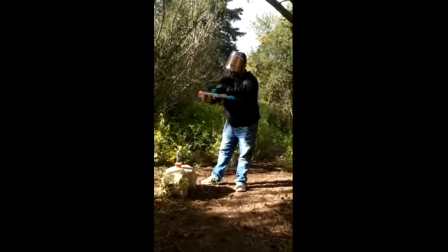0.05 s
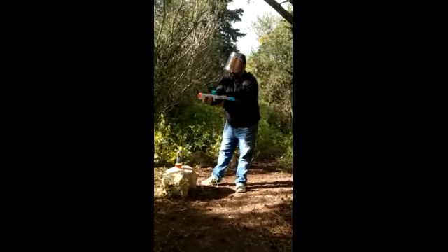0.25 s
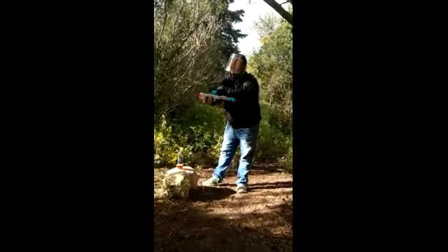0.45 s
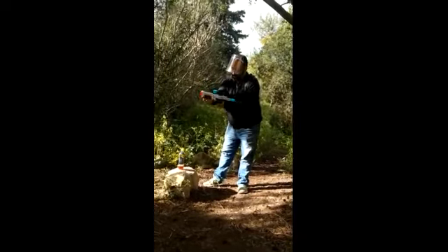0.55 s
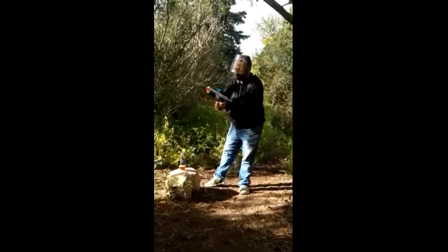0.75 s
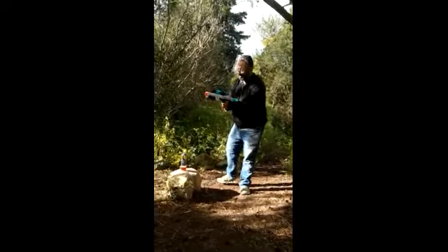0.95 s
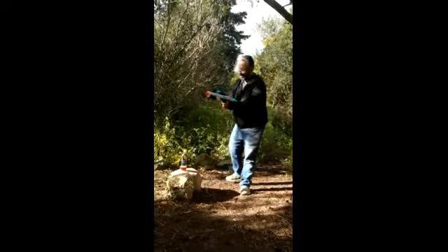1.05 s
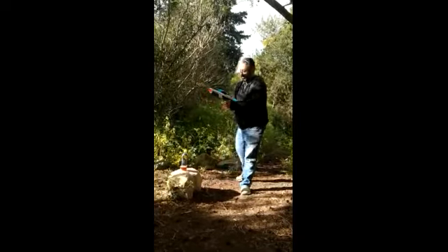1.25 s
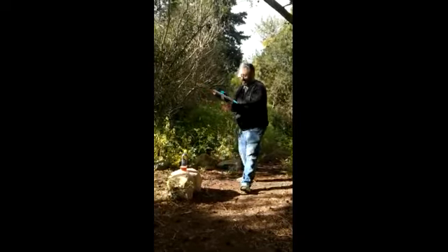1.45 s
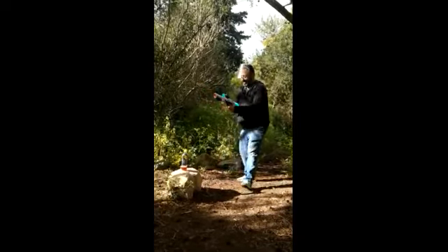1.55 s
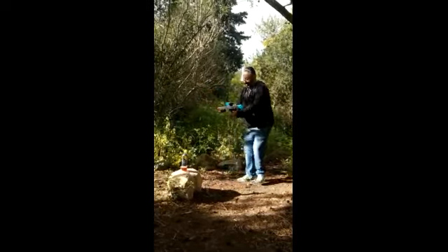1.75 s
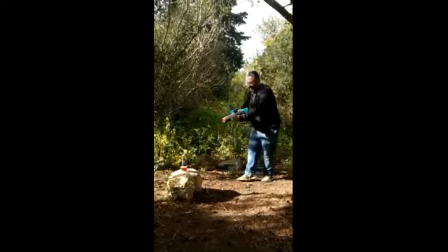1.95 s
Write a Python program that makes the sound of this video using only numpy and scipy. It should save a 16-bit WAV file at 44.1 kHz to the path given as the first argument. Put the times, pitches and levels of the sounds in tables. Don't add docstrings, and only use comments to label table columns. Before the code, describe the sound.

A plastic toy shotgun is handled a few metres away: light clicks, a sharp snap, a much louder clack, then smaller rattles, with wind rumbling on the microphone, mostly left, in a quiet wood.

```python
import sys
import numpy as np
from scipy import signal
from scipy.fft import rfft, irfft
from scipy.io import wavfile
from scipy.ndimage import uniform_filter1d

SR = 44100
rng = np.random.default_rng(int(sys.argv[2]) if len(sys.argv) > 2 else 0)


def int16_out(signal):
    q = np.round(np.clip(np.atleast_2d(signal).T, -1, 1) * 32767)
    wavfile.write(sys.argv[1], SR, q.astype(np.int16))


def linear_from_db(decibels):
    return 10 ** (np.asarray(decibels, float) / 20)


N = 88200

# (frequency [Hz], density [dB per Hz])
LEAF_SPECTRUM = [(88, -9.5), (150, -3.5), (545, -3), (745, -2.5), (1260, -5.5), (1720, -8), (3220, -9.5),
                 (7320, -16.5), (16000, -21.5)]
# (time [s], level [dB])
LEAF_SWELL = [(0, -55), (.3, -59), (.7, -59), (1.1, -59.5), (1.7, -59), (2, -61)]
# (frequency [Hz], left-right likeness [0-1])
LEAF_COHERENCE = [(250, 0.98), (1500, 0.6), (5000, 0.078)]
LEAVES_DB, PATCH_DB = -53, 1.3

# (time [s], length [s], level [dB], from [Hz], to [Hz], blur [Hz])
WHISTLES = [
    (.591, .019, -51, 4850, 4150, 120),
    (.617, .022, -51, 4450, 3700, 120),
    (.6, .09, -56, 4400, 3700, 700),
    (.645, .022, -57, 3400, 3050, 150),
    (1.64, .018, -56, 4650, 4550, 150),
    (1.66, .014, -56, 4300, 3900, 200),
    (1.65, .09, -55, 4500, 4200, 1100),
    (1.67, .16, -64, 7500, 7500, 1000),
    (1.74, .16, -63, 5000, 4900, 900),
]
BIRD_BREAK_DB = 2.5
CLEAR_HZ = 250

# (time [s], level [dB], left-right [dB])
GUSTS = [(0.0, -29, 19), (0.05, -40, 6), (0.19, -41, 13), (0.21, -36.5, 17), (0.46, -37, 16.0),
         (0.49, -28.5, 28.5), (0.59, -33.5, 16), (0.67, -34, 20), (0.91, -44, 3), (1.06, -39, 20),
         (1.12, -46.5, 6), (1.34, -38.5, 23), (1.36, -44, -1.0), (1.44, -51, 3), (1.53, -38, -10),
         (1.62, -49, 3), (1.94, -49, 4), (2.0, -59, -2.5)]
# (frequency [Hz], density [dB per Hz])
WIND_SPECTRUM = [(4, -30), (9, -3), (27, 0), (60, 0), (110, -9), (200, -27), (300, -36), (500, -50),
                 (1100, -120)]
# (time [s], level [dB], length [s])
BUFFETS = [
    [(.007, -26.5, .01), (.179, -26.5, 0.0084), (0.221, -21, 0.0098), (.417, -23, .012),
     (0.51, -41, 0.0069), (0.578, -26, 0.0097), (0.626, -21, 0.0087), (0.68, -20, 0.015),
     (0.693, -22.5, 0.022), (1.036, -23.5, 0.011), (1.05, -24.5, 0.028), (1.096, -24.5, 0.02),
     (1.226, -23, 0.012), (1.325, -22, 0.019)],
    [(1.374, -43, 0.011), (1.458, -45, 0.0085), (1.537, -47.5, 0.0083), (1.553, -28, 0.041),
     (1.742, -33, 0.0086)],
]
LUMP_DB, LUMP_S = 2.5, 0.046
ROAR_HZ, ROAR_SHARE, CALM_DB = 76, 0.14, -31

# (time [s], peak [dB], pitch [Hz],
# left-right [dB])
TICKS = [(0.079, -23.5, 1690, 7.5), (.255, -38.5, 740, -2), (.915, -44.5, 600, 18), (1.089, -31, 170, 11),
         (1.0925, -35, 290, -2), (1.096, -40, 573, 7), (1.101, -34.5, 840, 5), (1.105, -40.5, 343, 2),
         (1.1349, -22.5, 7100, 11.5), (1.134, -33.5, 4200, 3), (1.322, -32, 1140, 5), (1.604, -28, 1210, 6),
         (1.604, -32.5, 634, 1.5), (1.614, -38, 1210, 5), (1.627, -43, 1100, 5), (1.645, -41, 860, 16),
         (1.715, -44, 990, 3), (1.724, -39, 1250, 0), (1.723, -40, 645, -2), (1.55, -45, 2350, 3)]
TICK_CYCLES, TICK_SNAP_DB = 14.5, -20

# (frequency [Hz], 60 dB decay [s])
TREE_DECAY = [(500, 0.35), (2000, 0.25), (6000, 0.29), (14000, 0.25)]
TREES_DB, TREES_RISE_S, TREES_OWN = -11, 0.0035, 0.97
# (delay [s], level [dB])
BOUNCES = [(.0007, -12), (.0016, -6.5), (.0031, -12.5), (.0052, -21.5)]
# (frequency [Hz], left-right [dB])
PORT_TILT = [(380, -0.5), (700, -0.5), (1290, 1), (2380, 3.5), (4400, 3), (8120, -1), (15000, -0.5)]
LAG_S = 0.00015

# (frequency [Hz], width [Hz], level [dB])
SHELL_MODES = [(424, 140, -41), (740, 167, 13.5), (970, 58, -31), (1125, 200, 8.5), (1584, 138, 8),
               (2118, 186, 10.5), (2800, 460, 5), (3973, 674, 4.5), (4554, 790, 5), (5650, 830, 2.5),
               (7670, 670, 1.5), (9500, 1500, 0), (11400, 2120, -1.5), (15100, 1800, -4)]
SPREAD_OCT, ABOVE_OCT = 1.54, 1.52
CLICKS_PER_S, SLIPS_PER_S, CLICK_SPREAD_DB = 6800, 1900, 3.5
# (time [s], length [s], level [dB], brightness centre [Hz])
SLIDES = [(0.121, 0.046, -53, 4270), (0.74, 0.055, -38.5, 3000), (0.327, 0.038, -38.5, 5100),
          (0.782, 0.096, -33.5, 3340), (1.01, 0.033, -42, 1540), (1.023, 0.11, -50.5, 3850),
          (1.349, 0.037, -41.5, 2550), (1.357, 0.081, -47.5, 2750)]
# (time [s], peak [dB], pitch [Hz])
RINGS = [(0.3232, -9.5, 4600), (.3228, -19.5, 3000), (.324, -16, 5500), (.3232, -14, 2190),
         (0.3231, -27, 1120), (.3232, -31, 740), (0.7762, -4, 2823), (0.7776, -18, 1223),
         (0.7769, -19.5, 912), (.7765, -12, 1600), (.777, -29, 600), (.7762, -23, 7600),
         (.7785, -15.5, 2290), (.778, -22, 5780)]
RING_T60_S = 0.017
# (time [s], peak [dB], brightness centre [Hz], chatter [s])
BLOWS = [(0.111, -28.5, 3570, 0.0065), (0.125, -52, 4000, 0.0041), (.154, -34.5, 2710, 0.0028),
         (.216, -40, 4200, 0.032), (0.3195, -18.5, 5040, 0.011), (.3226, -9, 9300, 0.0018),
         (0.3229, -9.5, 6000, 0.0027), (0.3262, -19.5, 6000, 0.0032), (0.375, -32, 2340, 0.0054),
         (0.469, -33, 3170, 0.003), (0.535, -34.5, 2500, 0.0043), (.560, -25, 3840, 0.0052),
         (0.679, -40.5, 4470, .004), (0.711, -39, 2860, 0.034), (.740, -20.5, 2820, 0.003),
         (0.765, -21, 3400, 0.013), (0.7663, -21.5, 6000, .002), (.7761, -2, 9100, 0.0017),
         (0.7766, -4.5, 7060, 0.0011), (0.7781, -3.5, 5100, 0.002), (.7791, -11, 3030, 0.00047),
         (.7803, -12, 4030, 0.0024), (.7822, -14.5, 3060, 0.0025), (0.7854, -18, 5040, .003),
         (0.7906, -14, 3950, 0.0042), (0.796, -19, 6500, 0.029), (.803, -21, 2240, 0.0024),
         (.812, -26.5, 2000, 0.0037), (.83, -28.5, 1600, 0.0042), (.843, -32.5, 1310, 0.004),
         (1.0088, -27.5, 2200, 0.011), (1.021, -26, 4580, 0.0058), (1.033, -30.5, 1800, 0.0034),
         (1.04, -37, 1500, 0.0036), (1.047, -40, 2300, 0.0022), (1.054, -30, 4560, 0.0074),
         (1.064, -37.5, 2300, 0.0057), (1.071, -35.5, 3960, 0.0047), (1.3197, -37.5, 5900, 0.013),
         (1.352, -50, 4900, 0.0017), (1.363, -25.5, 3750, 0.007), (1.406, -37.5, 2800, 0.0068),
         (1.873, -45, 4970, 0.0073)]
BLOW_RISE_S, FIRST_CLICK = 0.0003, 5.44

EDGE_HZ, FLOOR_EDGE_HZ = 16100, 15900
JOIN_HZ, JOIN_RISE_DB, JOIN_HOLD_S = 6600, 13, 0.014
TOP_HZ, TOP_SHARED = 8400, 0.3
FADE_S, FADE_IN_S = 0.022, 0.004


def evened(x):
    return x / np.sqrt(np.mean(x ** 2) + 1e-20)


def read(points, hz):
    f, value = np.transpose(points)
    return np.interp(np.log(hz + 1), np.log(f + 1), value)


def add(mix, s, sound):
    part = mix[..., round(s * SR):][..., :sound.shape[-1]]
    part += sound[..., :part.shape[-1]]


def resonate(x, hz, width):
    turn = np.exp(2j * np.pi * np.cumsum(hz * np.ones(len(x))) / SR)
    r = np.exp(-np.pi * width / SR)
    return 2 * (turn * signal.lfilter([1 - r], [1, -r], x / turn + 1e-18)).real


def coloured(x, points):
    size = x.shape[-1]
    return irfft(rfft(x) * linear_from_db(read(points, np.fft.rfftfreq(size, 1 / SR))), size)


def low_pass(x, hz):
    taps = signal.firwin(511, hz, window=("kaiser", 9), fs=SR)
    return signal.oaconvolve(x, taps[None], "same")


def leaves():
    frames, hz = N // 128 + 5, np.fft.rfftfreq(512, 1 / SR)
    a, b, c, d, patches = rng.standard_normal((frames, 257, 5)).T
    patches = uniform_filter1d(patches, size=6, axis=0)
    patches = evened(uniform_filter1d(patches, size=16, axis=1))
    same = np.clip(read(LEAF_COHERENCE, hz), -1, 1)[:, None]
    left = a + 1j * b
    right = same * left + np.sqrt(1 - same ** 2) * (c + 1j * d)
    z = np.array([left, right]) * linear_from_db(read(LEAF_SPECTRUM, hz)[:, None] + PATCH_DB * patches)
    hiss = evened(signal.istft(z, nperseg=512, noverlap=384)[1][:, :N])
    s, db = np.transpose(LEAF_SWELL)
    return hiss * linear_from_db(LEAVES_DB + np.interp(np.arange(N) / SR, s, db - db[-2]))


def bird():
    out = np.zeros(N)
    for s, length, db, from_hz, to_hz, blur in WHISTLES:
        u = np.arange(9000) / SR / length
        hz = from_hz + (to_hz - from_hz) * np.minimum(u, 1)
        tone = resonate(resonate(rng.standard_normal(len(u)), hz, blur), hz, blur)
        broken = BIRD_BREAK_DB * evened(uniform_filter1d(rng.standard_normal(len(u)), size=300))
        whistle = evened(tone) * min(blur / CLEAR_HZ, 1)
        if blur < CLEAR_HZ:
            whistle = whistle + np.sin(2 * np.pi * np.cumsum(hz) / SR)
        swell = np.sin(np.pi * np.minimum(u, 1)) ** 0.5
        add(out, s, linear_from_db(db + broken) * whistle * swell)
    return out


def wind():
    s, db, pan_db = np.transpose(GUSTS)
    t = np.arange(N) / SR
    lump_size = round(LUMP_S * SR)
    lumps = uniform_filter1d(rng.standard_normal((2, N)), lump_size)
    lumps = evened(uniform_filter1d(lumps, lump_size))
    air = evened(coloured(rng.standard_normal((2, N)) * linear_from_db(LUMP_DB * lumps), WIND_SPECTRUM))
    low = signal.sosfiltfilt(signal.butter(2, ROAR_HZ, fs=SR, output="sos"), air)
    lean = np.interp(t, s, pan_db)
    level_db = np.interp(t, s, db) + np.minimum(np.array([lean, -lean]), 0)
    roar = (air - low) * linear_from_db(ROAR_SHARE * (level_db - CALM_DB))
    out = (low + roar) * linear_from_db(level_db + 4)
    for port, buffets in enumerate(BUFFETS):
        for at, buffet_db, length in buffets:
            u = (t - at) / length
            out[port] += linear_from_db(buffet_db) * (1 - 1.1 * u - 12 * u ** 2) * np.exp(-6 * u ** 2)
    return out


def ticks():
    out, t = np.zeros((2, N)), np.arange(900) / SR
    for s, db, hz, pan_db in TICKS:
        decay = linear_from_db(-60 * t * hz / TICK_CYCLES / np.sqrt(hz / 1500))
        ring = np.sin(2 * np.pi * hz * t) * decay * np.minimum(t / 0.00079, 1)
        snap = linear_from_db(TICK_SNAP_DB) * rng.standard_normal(len(t)) * np.exp(-t / 0.002)
        add(out, s, linear_from_db(db) * linear_from_db([[pan_db / 2], [-pan_db / 2]]) * (ring + snap))
    return out


def trees(x):
    shared, own = rng.standard_normal(SR // 2), rng.standard_normal((2, SR // 2))
    hz, t, z = signal.stft(shared + TREES_OWN * own, SR, nperseg=256)
    decay = linear_from_db(-60 * t / read(TREE_DECAY, hz)[:, None])
    tail = signal.istft(z * decay, SR, nperseg=256)[1]
    tail = tail * np.minimum(np.arange(tail.shape[1]) / SR / TREES_RISE_S, 1)
    return signal.fftconvolve(x[None], tail / np.linalg.norm(tail[0]), axes=1)[:, :N]


def nearby(x):
    taps = np.zeros((2, 400))
    taps[:, 0] = 1
    for k, (delay, db) in enumerate(BOUNCES):
        at = np.round(delay * SR * np.array([1.15, 0.85])).astype(int)
        taps[[0, 1], at] += (-1) ** k * linear_from_db(db)
    return signal.oaconvolve(x[None], taps, axes=1)[:, :N]


def ports(x):
    hz = np.fft.rfftfreq(N, 1 / SR)
    tilt = linear_from_db(read(PORT_TILT, hz) / 2)
    lag = np.exp(-2j * np.pi * hz * LAG_S)
    return irfft(rfft(x) * np.array([tilt * lag, 1 / tilt]), N)


def clicks(rate, size):
    chance, sign, big = rng.random((size, 3)).T
    heights = linear_from_db(-CLICK_SPREAD_DB * np.log(big + 0.023))
    return (chance < rate / SR) * np.sign(sign - 0.5) * heights


def shell(drive, centre_hz):
    body = 0
    for k, (hz, width, db) in enumerate(SHELL_MODES):
        spread = SPREAD_OCT if hz < centre_hz else ABOVE_OCT
        mode_db = db - 8.06 * (np.log2(hz / centre_hz) / spread) ** 2
        body = body + (-1) ** k * linear_from_db(mode_db) * resonate(drive, hz, width)
    return evened(body)


def slides():
    out = np.zeros(N)
    for s, length, db, centre_hz in SLIDES:
        u = np.arange(4400) / SR / length
        stroke = np.sin(np.pi * np.minimum(u, 1) ** 0.37)
        add(out, s, linear_from_db(db) * shell(clicks(SLIPS_PER_S, len(u)), centre_hz) * stroke)
    return out


def rings():
    out, t = np.zeros(N), np.arange(2600) / SR
    for s, db, hz in RINGS:
        decay = linear_from_db(db - 60 * t / RING_T60_S * np.sqrt(hz / 2000))
        add(out, s, decay * np.sin(2 * np.pi * hz * t) * np.minimum(t / 0.00107, 1))
    return out


def blows():
    out, t = np.zeros(N), np.arange(2600) / SR
    for s, db, centre_hz, chatter in BLOWS:
        contacts = clicks(CLICKS_PER_S, len(t)) + 0.55 * rng.standard_normal(len(t))
        drive = contacts * np.exp(-t / chatter) * np.minimum(t / BLOW_RISE_S, 1)
        drive[8] += FIRST_CLICK
        sound = shell(drive, centre_hz)
        add(out, s, linear_from_db(db) * sound / abs(sound).max())
    return out


def scene():
    toy = slides() + rings() + blows()
    far = low_pass(linear_from_db(TREES_DB) * trees(toy) + leaves() + bird(), FLOOR_EDGE_HZ)
    return ports(nearby(toy) + far) + ticks() + wind()


def joined(x):
    high = x - low_pass(x, JOIN_HZ)
    power = uniform_filter1d((high ** 2).sum(0), size=128) + 1e-12
    before = np.roll(uniform_filter1d(power, size=256), 300)
    sharp = 10 * np.log10(abs(power / before)) > JOIN_RISE_DB
    held = uniform_filter1d(1. * sharp, round(JOIN_HOLD_S * SR)) > 1e-6
    apart = uniform_filter1d(1. * held, size=128)
    top = x - low_pass(x, TOP_HZ)
    return x + (1 - apart) * (high[1] - high) + apart * TOP_SHARED * (top[1] - top)


def top_cut(x):
    return signal.sosfilt(signal.butter(12, 16470, fs=SR, output="sos"), x)


def record(dry):
    t = np.arange(N) / SR
    fade = np.clip(np.minimum((N / SR - t) / FADE_S, t / FADE_IN_S), 0, 1)
    mix = joined(low_pass(dry * fade, EDGE_HZ))
    return top_cut(np.clip(mix, -1, 1))


dry = scene()
out = record(dry)
int16_out(out)
```